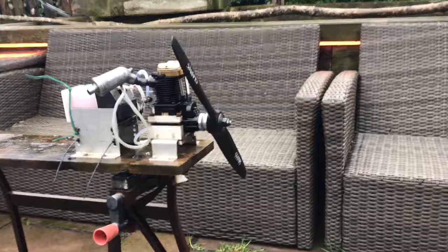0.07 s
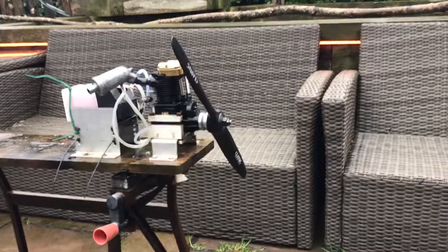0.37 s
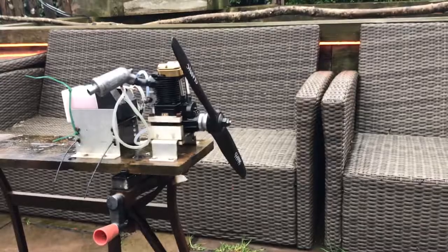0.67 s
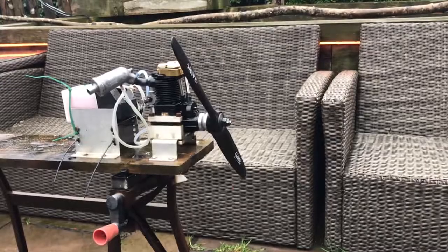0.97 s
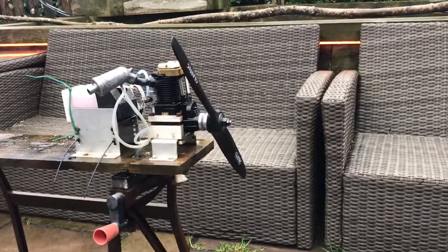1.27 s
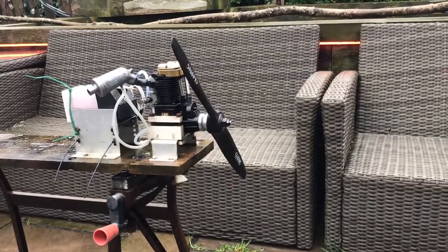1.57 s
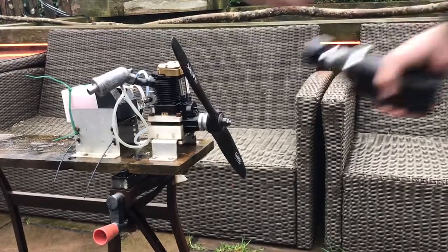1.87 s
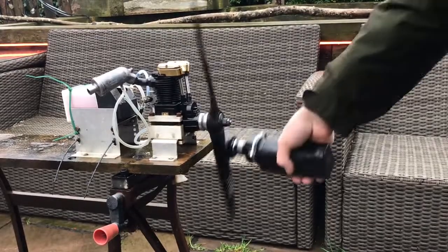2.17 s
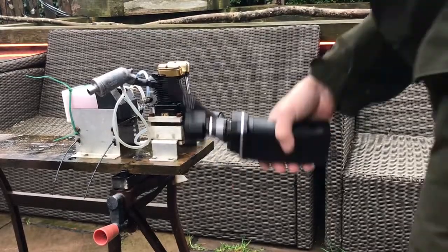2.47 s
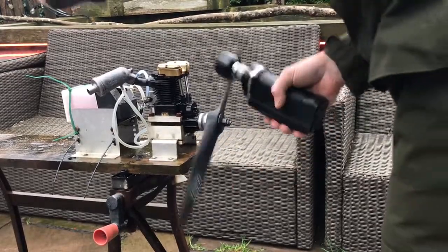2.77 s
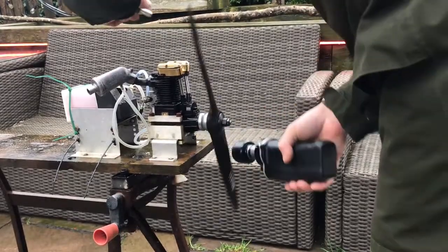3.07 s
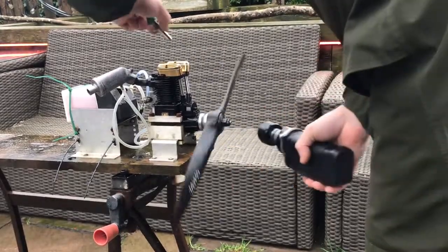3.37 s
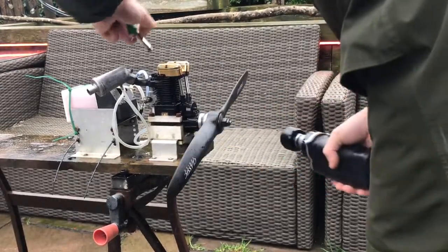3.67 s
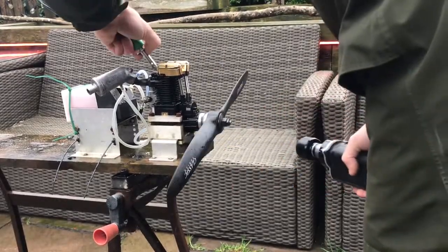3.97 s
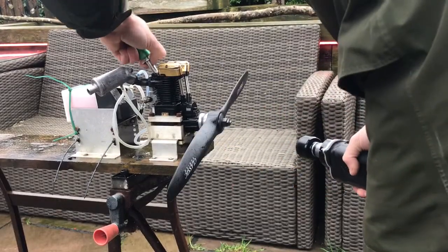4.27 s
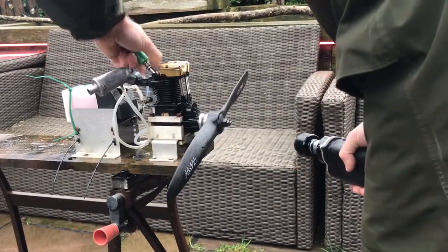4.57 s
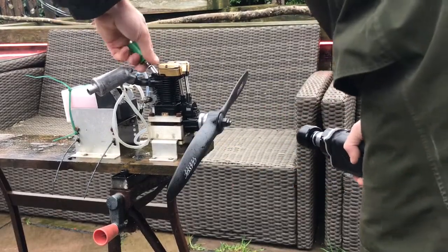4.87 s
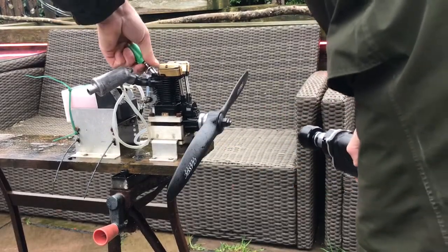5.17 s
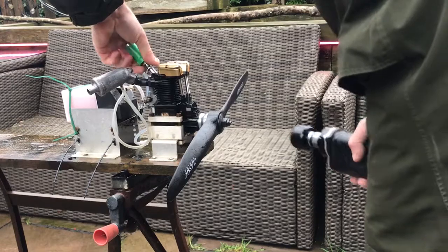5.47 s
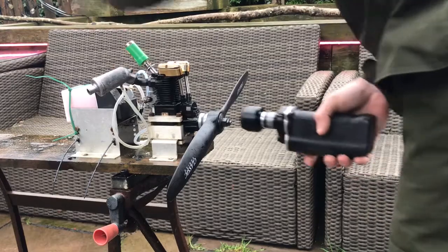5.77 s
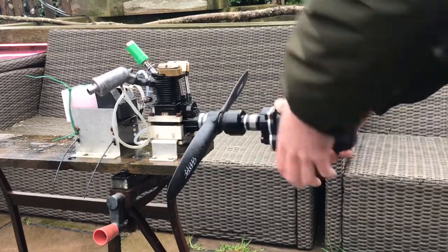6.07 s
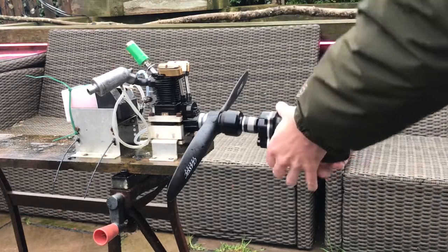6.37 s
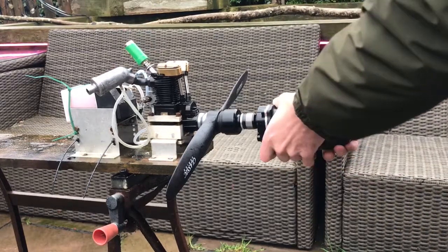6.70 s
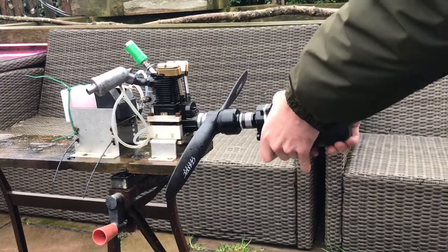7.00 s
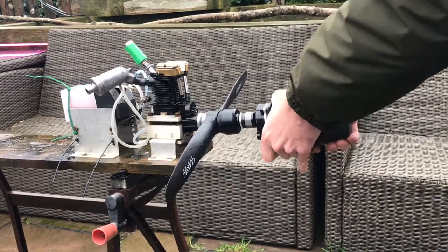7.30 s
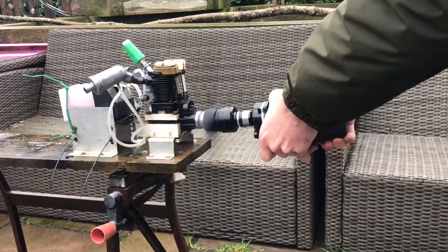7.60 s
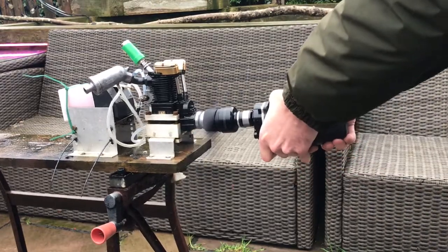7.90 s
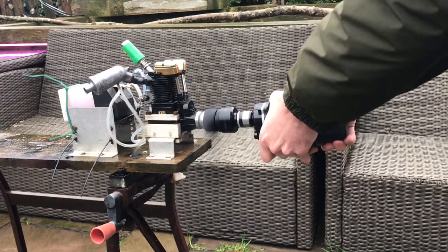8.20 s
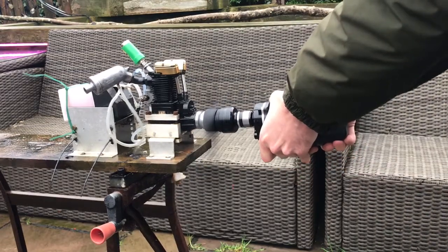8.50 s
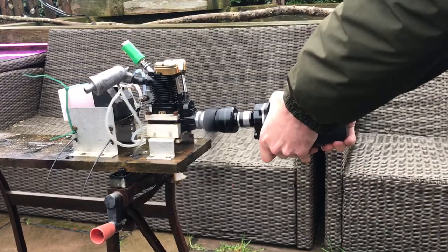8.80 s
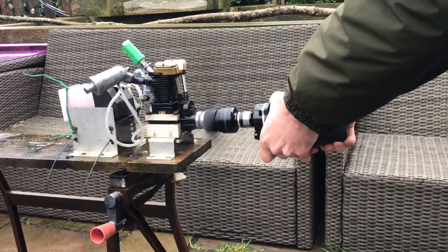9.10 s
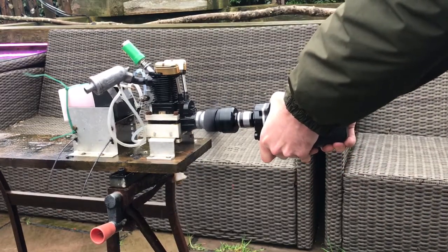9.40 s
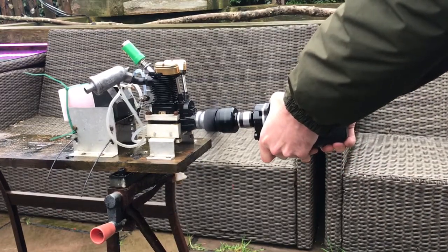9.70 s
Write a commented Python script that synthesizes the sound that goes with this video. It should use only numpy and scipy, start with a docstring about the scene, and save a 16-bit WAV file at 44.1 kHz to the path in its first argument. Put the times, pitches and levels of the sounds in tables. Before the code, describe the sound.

In a quiet garden, small birds chirp and gusts of wind thump on the nearby microphone. A jacket rustles, and a handheld electric starter knocks sharply against a model engine's propeller hub. Small metal clicks follow as the engine is handled. Near the end the starter spins up with a loud geared whine and rattle, cranking the engine in fast, even puffs, but it never fires.

```python
"""Cranking a model engine

A hand-held geared starter cranks a small four-stroke engine on a garden table; it does not fire.
First come impacts and friction: the starter's cone knocks the propeller hub, a glow igniter is
fitted, a jacket rustles. Then meshing gears whine and rattle under each compression while the engine
puffs once a cycle. Birds chirp; gusts and the propeller's draught buffet the microphone."""
import sys
import numpy as np
from scipy import signal
from scipy.fft import rfft, irfft
from scipy.io import wavfile
from scipy.ndimage import uniform_filter1d

SR = 44100
rng = np.random.default_rng(int(sys.argv[2]) if len(sys.argv) > 2 else 0)


def persist_wave(psi):
    """Save psi, clipped to +-1, as 16-bit WAV."""
    counts = np.round(np.clip(psi, -1, 1) * 32767).astype(np.int16)
    wavfile.write(sys.argv[1], SR, np.atleast_2d(counts).T)


N = 434385
TIME = np.arange(N) / SR
TRIGGER_S, FIRST_PUFF_S = 7.426, 7.541

# spectra of the distant background, wind buffeting and small eddies: f/Hz, relative level/dB
GARDEN_SPECTRUM = [(30, 7), (70, 2), (150, -12.5), (300, -8), (700, -11.5), (1250, -10.5), (2000, -21),
                   (4000, -29.5), (8000, -38), (16000, -41)]
BUFFET_SPECTRUM = [(15, -40), (30, -33.5), (48, 2), (80, 1), (120, -4.5), (200, -17), (300, -30),
                   (500, -54)]
EDDY_SPECTRUM = [(25, -38), (50, -16), (110, 0.5), (200, 3.5), (330, -6.5), (520, -21), (900, -36),
                 (2000, -90)]
# gusts on the microphone: t/s, duration/s, buffeting level/dB, eddy level/dB
WIND_GUSTS = [(0.1, 0.032, -38.5, -58), (0.174, 0.033, -36.5, -68), (0.447, 0.13, -40, -54),
              (0.854, 0.019, -38.5, -77), (1.015, 0.053, -46.5, -75), (1.178, 0.037, -45, -56),
              (1.861, 0.046, -67, -52), (2.246, .26, -40, -47.5), (2.378, 0.039, -35, -38),
              (2.836, 0.029, -40, -37.5), (2.876, 0.055, -33, -35.5), (3.007, 0.081, -39.5, -45.5),
              (3.203, 0.093, -39.5, -53), (3.39, 0.052, -36.5, -48), (3.49, 0.03, -38.5, -50.5),
              (3.787, 0.22, -38, -49), (4.251, 0.084, -38.5, -49), (4.337, 0.16, -43, -49.5),
              (4.556, 0.088, -38.5, -52), (4.675, 0.097, -41, -65), (5.182, 0.039, -40, -58),
              (5.288, 0.027, -35, -58), (5.388, 0.11, -36, -60), (5.565, 0.044, -36, -41.5),
              (5.735, 0.088, -50, -49), (5.878, 0.053, -42, -48.5), (6.07, 0.049, -42, -45),
              (6.237, 0.084, -39.5, -48), (6.374, 0.037, -41, -39), (6.498, 0.1, -35.5, -38.5),
              (6.728, 0.18, -40.5, -46.5), (7.054, 0.09, -42, -49.5), (7.313, 0.17, -39.5, -44.5),
              (8.24, 0.18, -36.5, -49), (8.807, 0.11, -32, -52), (9.42, 0.071, -30, -35.5),
              (9.503, 0.089, -38, -33.5)]
# light air between the gusts: t/s, buffeting level/dB
BREEZE_LEVEL = [(0, -49), (1.3, -57.5), (2.05, -59.5), (2.6, -47), (3.6, -54), (4.2, -54), (5.6, -52),
                (6.3, -41.5), (7, -49), (9.85, -37.5)]
# eddies that strike the microphone squarely: t/s, f/Hz, peak level/dB
LARGE_EDDIES = [(2.404, 169, -25), (2.858, 209, -28.5), (2.896, 373, -24.5), (2.898, 69.6, -26),
                (2.918, 190, -29), (2.93, 110, -30), (3.042, 165, -29), (3.933, 125, -29),
                (4.266, 140, -27.5), (5.586, 161, -32), (6.092, 137, -29), (6.123, 112, -25),
                (6.247, 97, -28.5), (6.28, 122, -23), (6.4, 420, -33), (6.402, 177, -25.5),
                (6.497, 115, -28), (6.525, 95, -20), (6.569, 158, -32), (6.588, 186, -29),
                (6.894, 136, -28), (7.067, 139, -33.5), (7.114, 137, -30), (7.342, 215, -26),
                (7.412, 130, -28)]

# two-note chirrups: t/s, relative level/dB, pitch factor, duration factor, fall in level/dB,
# phase jitter/rad, gain of the direct sound/dB
BIRD_CHIRRUPS = [(.112, -54, 0.98, 0.95, 7.5, 0.5, 4), (0.679, -55, 0.98, 0.91, 8.5, 0.6, 2.5),
                 (1.538, -56.5, 0.98, 0.88, 2.5, 0.46, 1.5), (2.921, -66.5, 0.99, 0.84, -6, 0.54, -2),
                 (3.198, -54.5, 1.04, 0.97, 6, 0.56, -2), (4.205, -57.5, 0.99, 1.1, 14, .65, -3),
                 (4.459, -56, 1.02, 1, 9, 0.91, -7), (5.744, -56.5, 0.94, 0.57, 6, 0.89, -7),
                 (6.89, -59, 1.06, 1.0, 7, 0.57, 0)]
# contour of one chirrup: t/s, f/Hz, relative level/dB
CHIRRUP_CONTOUR = [(0, 4020, 1), (.009, 4490, 2.5), (.032, 4410, 2), (.043, 3630, 6.5), (.06, 3430, -10),
                   (.078, 2960, 2), (.106, 3880, 7), (.118, 2950, 8), (.135, 2750, -28)]
# rasp that opens a chirrup: f/Hz, relative level/dB
RASP_SPECTRUM = [(4000, -8), (4700, -10), (6200, -7), (7500, -16)]
# thin whistled notes: t/s, duration/s, start f/Hz, end f/Hz, relative level/dB
BIRD_WHISTLES = [(3.51, 0.06, 6940, 6400, -65), (3.544, 0.14, 6350, 5650, -62),
                 (3.668, 0.039, 4450, 5600, -64), (3.676, 0.046, 6150, 5850, -54.5),
                 (4.765, 0.069, 6340, 4970, -67), (4.874, 0.076, 5250, 5800, -58.5),
                 (5.288, 0.031, 7000, 6160, -67), (5.3, .045, 4560, 4780, -63),
                 (5.34, 0.05, 4970, 6150, -57.5), (5.423, 0.044, 4900, 5300, -61.5),
                 (6.39, 0.052, 5800, 5600, -55), (6.48, 0.049, 5350, 5850, -54),
                 (7.223, 0.046, 4500, 5440, -58), (7.276, 0.017, 5860, 5880, -52),
                 (7.285, 0.047, 5430, 4960, -59), (7.343, 0.044, 3560, 5100, -55.5)]

# strokes of the jacket sleeve: t/s, duration/s, level/dB
SLEEVE_STROKES = [(0.475, 0.28, -65), (0.627, 0.2, -67.5), (1.103, 0.24, -60), (1.365, 0.56, -65.5),
                  (1.842, 0.046, -50.5), (1.946, 0.3, -60.5), (2.364, 0.15, -61.5), (2.86, 0.21, -72),
                  (5.776, 0.16, -52.5), (6.003, 0.4, -50.5), (6.494, 0.14, -53), (6.554, 0.04, -55),
                  (6.654, 0.056, -52.5)]
# rubbing nylon: f/Hz, relative level/dB
NYLON_SPECTRUM = [(880, -4), (1500, -6.5), (1790, -7), (2250, -6), (5070, -10), (5600, -7.5), (7690, -10.5),
                  (15100, -10.5), (16000, -3.5)]

# clicks of the glow igniter and the starter: t/s, level/dB
SMALL_CLICKS = [(1.261, -34), (1.273, -46), (1.8967, -39.5), (4.294, -49), (4.371, -53), (4.391, -57),
                (4.4547, -51), (4.547, -37), (4.581, -53), (4.7046, -53), (4.721, -51), (5.4222, -58),
                (6.268, -54), (6.288, -56), (6.349, -54), (6.44, -40), (6.639, -40), (7.385, -45),
                (7.403, -45), (7.623, -37)]
# knocks on the engine: t/s, crack level/dB, mount level/dB, struck part's f/Hz, its level/dB
ENGINE_KNOCKS = [(1.997, -59, -60, 1310, -49), (2.1835, -55, -56, 1003, -52),
                 (2.1919, -16, -32.5, 1940, -21), (4.55, -50, -58.5, 855, -32),
                 (4.581, -54, -59.5, 1010, -52), (5.4212, -56, -67, 1400, -54),
                 (5.896, -58, -58, 1340, -45), (5.98, -39, -55.5, 1325, -30), (6.267, -56, -65, 686, -50),
                 (6.3488, -44, -63, 1090, -46), (7.427, -43, -46.5, 1240, -42),
                 (7.497, -51, -47, 1200, -46), (7.542, -43, -51, 1220, -35), (7.625, -49, -47, 686, -35),
                 (7.671, -42, -47, 1130, -37), (7.729, -41, -50, 690, -34.5), (7.777, -46, -49, 1190, -38),
                 (7.826, -43, -47, 640, -34), (7.932, -31, -46, 1310, -30), (8.021, -37, -47, 1210, -29)]
# modes of the engine mount and table: f/Hz, relative level/dB, T60/s
MOUNT_MODES = [(118, -9, .16), (222, -7, 0.16), (271, -10, .16), (330, -2, .19), (366, -1, 0.19),
               (467, -4, 0.2), (711, -5, 0.13), (865, 6.5, 0.08), (948, -3, 0.12), (1064, 6, 0.1),
               (1157, -2, 0.14), (1297, 1, 0.075), (2380, 0, .06), (2562, -3, 0.08), (3216, -6, 0.052),
               (4600, -19, 0.08), (6100, -19.5, .1), (8140, -21, .08)]
# spectra of a click, a knock's crack and the table top's dense, damped modes: f/Hz, relative level/dB
CLICK_SPECTRUM = [(700, 0), (2000, -7), (5000, -0.5), (8000, -5), (10300, -6), (12000, -5.5), (16000, -12)]
CRACK_SPECTRUM = [(200, -10), (500, -20), (1100, -2.5), (2400, 1), (3400, -5), (4500, -5.5), (5700, -4),
                  (6700, -17), (7600, -11.5), (10000, -25.5), (16000, -30)]
TABLETOP_SPECTRUM = [(150, -0.5), (330, -0.5), (560, 1), (800, 0), (1300, -3), (2000, -17)]

# scuff of the starter in the hand: t/s, duration/s, level/dB
SCUFFS = [(1.884, .04, -50.5)]
# air leaving the cylinder as the propeller is turned slowly: t/s, duration/s, level/dB
CYLINDER_LEAKS = [(2.398, 0.37, -60.5), (2.844, 0.27, -61.5), (7.435, .12, -62)]
# spectra of the scuff and of air forced through a narrow gap: f/Hz, relative level/dB
SCUFF_SPECTRUM = [(400, -2), (1000, 3.5), (1500, -5), (3000, -7), (5300, -4), (8000, -11), (12000, -12),
                  (16000, -13)]
LEAK_SPECTRUM = [(4000, -7), (10000, -20), (11800, -7), (14500, 1), (16000, -3)]
# squeaks of the rubber cone: t/s, duration/s, start f/Hz, end f/Hz, level/dB
CONE_SQUEAKS = [(2.435, 0.062, 1034, 1170, -49), (6.004, 0.24, 1510, 1640, -58)]

# rotation of the crankshaft: t/s, f/Hz
CRANK_SPEED = [(7.42, 8), (7.6, 15.42), (7.8, 21.14), (8.05, 21.92), (8.5, 22.57), (9.1, 22.96),
               (9.85, 23.6)]
# mean rotation of the starter motor, which spins up, slows under load and recovers: t/s, f/Hz
MOTOR_SPEED = [(7.43, 105), (7.47, 133), (7.55, 130), (7.62, 121), (7.72, 112), (7.8, 118), (7.9, 123),
               (8.05, 125.6), (8.5, 127.4), (9.1, 129.4), (9.85, 132)]
# effort of the starter: t/s, rattle level/dB, whine level/dB, added tooth bite, housing level/dB
STARTER_EFFORT = [(7.43, -48.5, -51, 8, -44), (7.52, -46, -50, 10, -49), (7.56, -38, -49, 13, -43),
                  (7.62, -39.5, -43.5, 13, -57), (7.76, -37.5, -44, 10, -63), (7.87, -36, -37, 6, -57),
                  (8.2, -36.5, -33.5, 2, -46), (8.9, -34, -33.5, 2.5, -41),
                  (9.85, -34.5, -35.5, 1.5, -33.5)]
# one four-stroke cycle: phase/cycles, gear load/dB, tooth bite, low-tone level/dB, gas flow/dB,
# hiss level/dB, speed surge
ENGINE_CYCLE = [(0, 3, -5, -1, -0.5, -10, .01), (.05, 4, -3.5, -1.5, -.5, -10, .016),
                (.15, 3, -4, 0, -2.5, -3, .02), (.22, 1.5, -8.5, -1, -13, -2, .012),
                (.32, 3.5, -5, 1, -15, -20, .002), (.42, -1, -12.5, 0.5, -35, -24, -.004),
                (.55, -1, -11, -1, -28, -22, -.045), (.62, 2, -4, 1, -30, -3, -.034),
                (.665, 4.5, -5.5, -0.5, -27, 2, -.01), (.74, 4, 0.5, 1.5, -28, -3, .022),
                (.85, 0.5, -10.5, 2.5, -24, -14, .006), (.955, 2, -4, 2.5, -33, -18, .005),
                (1, 0, -2, 1.5, -6, -10, .01)]
# gear tones: multiple of the motor's rotation frequency, relative level/dB
GEAR_ORDERS = [(4, -31), (5, 1.5), (6, -12.5), (8, -19), (9, -8.5), (10, 0.5), (11, -2), (12, -14),
               (15, -10.5), (20.1, -11.5), (22, -19), (30, -10), (31, -11.5)]
# housing resonances excited by rattling, and those sustained by grinding: f/Hz, bandwidth/Hz, gain/dB
RATTLE_MODES = [(638, 134, 5), (1300, 55, -11), (2730, 380, 4), (3520, 250, -4), (5400, 750, -19)]
SINGING_MODES = [(706, 74, -17), (1348, 123, 0)]
# strength of the engine's puffs: t/s, level/dB
PUFF_LEVEL = [(7.5, -36), (7.7, -31.5), (8.2, -30), (8.42, -31.5), (8.6, -35.5), (9.0, -35), (9.85, -34.2)]
# blows in each cycle (a valve shuts, the piston thuds at compression, the gears cross their backlash):
# phase/cycles, f/Hz, ring level/dB, T60/s, crack level/dB
CYCLE_BLOWS = [(.23, 290, -41.5, 0.03, -52), (.28, 540, -34.5, 0.044, -43), (0.557, 502, -32, 0.036, -52),
               (.605, 1080, -25.5, 0.017, -36), (.63, 315, -30.5, .04, -50), (.655, 2630, -29, .022, -29),
               (.82, 960, -32.5, 0.023, -51)]
# force of those blows: t/s, gain/dB
BLOW_GAIN = [(7.5, -8), (7.9, -6), (8.3, -2), (9.1, 0), (9.85, -3)]
# spectra of the gearbox, the puffs of gas and struck steel: f/Hz, relative level/dB
GEARBOX_SPECTRUM = [(200, -16), (300, -12), (420, -20.5), (620, -8), (740, -16), (1000, -11), (1350, -13),
                    (1550, -7.5), (2100, -13.5), (3950, -14), (4800, -19), (5500, -13), (7500, -22),
                    (10400, -32), (12000, -27.5), (16000, -35.5)]
GAS_SPECTRUM = [(2000, -8.5), (4000, -9), (6500, -11.5), (7200, 3), (8100, 2), (8700, -5), (9400, -3.5),
                (10300, -12), (11700, -1), (12300, -4), (13200, -12.5), (14500, -12)]
STEEL_SPECTRUM = [(1000, -8), (2000, -5), (2700, 2.5), (4000, 7.5), (5700, 6.5), (7000, -19), (10000, -40),
                  (12500, -27), (16000, -17)]


def undb(db):
    """Amplitude ratio of a level in decibels."""
    return np.exp(np.asarray(db) * np.log(10) / 20)


def unit(x):
    """Normalisation to unit rms."""
    return x / np.sqrt(np.mean(x ** 2) + 1e-18)


def curve(rows, at=TIME):
    """Linear interpolation of each column against the first."""
    s, *columns = np.transpose(rows)
    return [np.interp(at, s, c) for c in columns]


def colour(x, points, size=8192):
    """Minimum-phase filter through (f/Hz, level/dB) points, with unit gain for white noise."""
    hz, db = np.transpose(points)
    f = np.fft.rfftfreq(size, 1 / SR) + 1
    octaves_outside = np.maximum(0, np.maximum(np.log2(hz[0] / f), np.log2(f / hz[-1])))
    gain = undb(np.interp(np.log(f), np.log(hz), db) - 24 * octaves_outside)
    cepstrum = irfft(np.log(unit(gain) + 1e-5))
    cepstrum[1:size // 2] *= 2  # folding the cepstrum makes the response causal
    cepstrum[size // 2 + 1:] = 0
    return signal.oaconvolve(x, irfft(np.exp(rfft(cepstrum))))[:len(x)]


def rounded(x, points):
    """Zero-phase filter: an impulse spreads symmetrically in time, leaving no sharp front."""
    hz, db = np.transpose(points)
    f = np.fft.rfftfreq(len(x), 1 / SR) + 1
    return irfft(rfft(x) * undb(np.interp(np.log(f), np.log(hz), db)), len(x))


def noise(points, count=N):
    """Gaussian noise of the given spectrum, with rms near 1."""
    return colour(rng.standard_normal(count), points)


def resonate(x, hz, width):
    """Second-order resonator with unit gain at its centre."""
    return signal.lfilter(*signal.iirpeak(hz, hz / width, fs=SR), x)


def walk(rate, count=N):
    """Smooth random modulation of unit rms, with `rate` new values a second."""
    hold = max(2, int(SR / rate))
    steps = np.repeat(rng.standard_normal(count // hold + 1), hold)[:count]
    return unit(uniform_filter1d(steps, hold))


def glide(hz, jitter_rad, jitter_hz):
    """Gliding tone: phase is the integral of frequency, roughened by random modulation."""
    return np.sin(2 * np.pi * np.cumsum(hz) / SR + jitter_rad * walk(jitter_hz, len(hz)))


def rise(s):
    """Exponential approach to 1 with time constant s."""
    return 1 - np.exp(-TIME[:SR // 2] / s)


def fade(t60):
    """Exponential decay, 60 dB in t60 seconds."""
    return np.exp(-np.log(1000) * TIME[:SR // 2] / t60)


def ring(hz, t60):
    """Free vibration of one damped mode."""
    return np.sin(2 * np.pi * hz * TIME[:SR // 2]) * fade(t60)


def burst(t60):
    """Exponentially decaying white noise."""
    return rng.standard_normal(SR // 2) * fade(t60)


def add(out, s, x):
    """Superposition of x on out, starting at time s."""
    i = int(s * SR)
    out[i:i + len(x)] += x[:max(0, N - i)]


def swells(starts, lengths, dbs, attack_s, release_s):
    """Envelope of pushes that rise, hold and decay; being incoherent, they add in power."""
    power = np.zeros(N)
    for s, length, db in zip(starts, lengths, dbs):
        t = TIME[TIME < length + 10 * release_s]
        attack = np.sin(np.pi / 2 * np.minimum(t / attack_s, 1)) ** 2
        release = np.exp(-np.maximum(t - length, 0) / release_s)
        add(power, s, (undb(db) * attack * release) ** 2)
    return np.sqrt(power)


def echo(x, t60, wet_db):
    """Scattering from fences, walls and furniture adds a diffuse tail to the direct sound."""
    tail = burst(t60) * (TIME[:SR // 2] > .004)
    return x + undb(wet_db) * signal.fftconvolve(x, tail / np.linalg.norm(tail))[:N]


def garden():
    """Incoherent sources, distant traffic and air, sum to a nearly steady noise."""
    swell_db = .4 * walk(2)
    return noise(GARDEN_SPECTRUM) * undb(-58 + swell_db)


def airflow():
    """Buffeting and eddy envelopes: gusts, breeze and the propeller's draught add in power."""
    starts, lengths, *levels = np.transpose(WIND_GUSTS)
    gust, gust_eddy = [swells(starts, lengths, db, attack_s=.012, release_s=.029) for db in levels]
    breeze = undb(curve(BREEZE_LEVEL)[0] + .64 * walk(13))
    relative_speed = curve(CRANK_SPEED)[0] / CRANK_SPEED[-1][1]
    draught = undb(-41.5) * relative_speed ** .52 * (TIME > TRIGGER_S)
    buffet = np.linalg.norm([gust, breeze, draught], axis=0)
    eddy = np.linalg.norm([gust_eddy, breeze * undb(-15.5), draught], axis=0)
    return buffet, eddy


def wind(calm_pops_per_s=95, doubling_db=-39):
    """Turbulence buffets the microphone; stronger flow sheds more small eddies, each a soft pop."""
    buffet_gain, eddy_gain = airflow()
    buffets = noise(BUFFET_SPECTRUM)
    buffets /= np.sqrt(uniform_filter1d(buffets ** 2, SR // 16) + .14)  # evens out chance swells
    rate = calm_pops_per_s * (1 + eddy_gain / undb(doubling_db))
    pops = (rng.random(N) < rate / SR) * rng.uniform(-1.04, 1, N)
    eddies = unit(rounded(pops, EDDY_SPECTRUM))
    eddies /= np.sqrt(uniform_filter1d(eddies ** 2, SR // 16) + .11)
    return buffets * buffet_gain * undb(2.73 * walk(40)) + eddies * eddy_gain


def birds(pitch_wander=.0277, rasp_s=.05):
    """Frequency-modulated whistles from the hedges; hidden birds are heard mostly by scattering."""
    song, direct = np.zeros((2, N))
    rasp_window = np.hanning(int(rasp_s * SR))
    for s, db, pitch, stretch, fall_db, jitter_rad, direct_db in BIRD_CHIRRUPS:
        t = TIME[TIME < CHIRRUP_CONTOUR[-1][0] * stretch]
        hz, shape_db = curve(CHIRRUP_CONTOUR, t / stretch)
        hz = hz * pitch * (1 + pitch_wander * walk(61.5, len(t)))
        envelope = undb(db + shape_db - np.linspace(0, fall_db, len(t)))
        call = envelope * glide(hz, jitter_rad, jitter_hz=1200)
        add(song, s, call)
        add(direct, s, undb(direct_db) * call)
        add(song, s - rasp_s, undb(db - 10) * rasp_window * noise(RASP_SPECTRUM, len(rasp_window)))
    for s, length, start_hz, end_hz, db in BIRD_WHISTLES:
        hz = np.linspace(start_hz, end_hz, int(length * SR))
        call = undb(db) * signal.windows.tukey(len(hz), .5) * glide(hz, jitter_rad=.7, jitter_hz=980)
        add(song, s, call)
        add(direct, s, call)
    scattered = echo(song, t60=.3, wet_db=2.5) - song
    return .66 * (direct + scattered)


def jacket(stir_db=-74, catch_db=2.3):
    """Stick-slip friction: nylon catches and lets go as the arm moves, and never lies quite still."""
    slips = unit(rng.standard_normal(N) * undb(1.1 * walk(1500)))
    strokes = swells(*np.transpose(SLEEVE_STROKES), attack_s=.095, release_s=.078)
    rubbing = np.hypot(strokes, undb(stir_db))
    return colour(slips, NYLON_SPECTRUM) * rubbing * undb(catch_db * walk(45))


def knocks(contact_s=.0007, mount_rise_cycles=2.5):
    """Impact excitation: a crack, then free modes of the struck part and mount; small parts click."""
    cracks, rings, clicks = np.zeros((3, N))
    modes = sum(undb(db) * ring(hz, t60) * rise(mount_rise_cycles / hz) * rng.choice([-1, 1])
                for hz, db, t60 in MOUNT_MODES)
    mount = undb(1.5) * modes + undb(2.5) * colour(burst(t60=.18), TABLETOP_SPECTRUM)
    for s, crack_db, mount_db, hz, part_db in ENGINE_KNOCKS:
        part = ring(hz, t60=.035) + 2.14 * ring(hz * 1.075, t60=.018)
        add(cracks, s, undb(crack_db) * burst(t60=.035) * rise(contact_s))
        add(rings, s, undb(mount_db) * mount + undb(part_db) * part * rise(contact_s))
    for s, db in SMALL_CLICKS:
        add(clicks, s, undb(db) * burst(t60=.013))
    impacts = colour(cracks, CRACK_SPECTRUM) + rings + colour(clicks, CLICK_SPECTRUM)
    return echo(impacts, t60=.2, wet_db=-13.5)


def scuff(grain_db=3):
    """Sliding friction: the starter slips grittily in the hand as it is lifted."""
    grit = unit(rng.standard_normal(N) * undb(grain_db * walk(500)))
    return colour(grit, SCUFF_SPECTRUM) * swells(*np.transpose(SCUFFS), attack_s=.013, release_s=.04)


def leaks():
    """Jet noise: air hisses through a narrow gap while the piston is pushed against compression."""
    flow = np.zeros(N)
    for s, length, db in CYLINDER_LEAKS:
        add(flow, s, undb(db) * signal.windows.tukey(int(length * SR), .5))
    return flow * noise(LEAK_SPECTRUM)


def thumps(sigma_cycles=.38):
    """A large eddy swings the pressure at the microphone to and fro in a Gaussian wave packet."""
    out = np.zeros(N)
    t = TIME[:SR // 10] - TIME[SR // 20]
    for s, hz, db in LARGE_EDDIES:
        swing = np.cos(2 * np.pi * (hz * t + rng.random()))
        add(out, s + t[0], undb(db) * swing * np.exp(-.5 * (hz * t / sigma_cycles) ** 2))
    return out


def squeak():
    """Stick-slip oscillation of the rubber cone as it is pressed against the hub."""
    out = np.zeros(N)
    for s, length, start_hz, end_hz, db in CONE_SQUEAKS:
        hz = np.linspace(start_hz, end_hz, int(length * SR))
        add(out, s, undb(db) * np.hanning(len(hz)) * glide(hz, jitter_rad=.64, jitter_hz=300))
    return out


def rattle(motor_hz, load_db, teeth=10, scatter_db=4, throb_db=1):
    """Forced vibration: teeth strike and slide, harder once a motor turn, and drive the housing."""
    n = len(motor_hz)
    turns = np.cumsum(motor_hz) / SR
    strikes = np.diff(np.floor(teeth * turns), prepend=0)
    strikes = unit(strikes * undb(scatter_db * rng.standard_normal(n)) * rng.choice([-1, 1], n))
    sliding = rng.standard_normal(n)
    force_db = load_db + throb_db * np.sin(2 * np.pi * turns) + .54 * walk(60.7, n)
    body = colour((.67 * strikes + .89 * sliding) * undb(force_db), GEARBOX_SPECTRUM)
    housing = sum(undb(db) * resonate(body, hz, width) for hz, width, db in RATTLE_MODES)
    return unit(body + .5 * housing)


def whine(motor_hz, bite, low_db, flutter=.0005):
    """Periodic meshing gives tones; the upper ones swell with bite and are roughened most by play."""
    n = len(motor_hz)
    angle = 2 * np.pi * np.cumsum(motor_hz * (1 + flutter * walk(70.6, n))) / SR
    tones = 0
    for order, db in GEAR_ORDERS:
        height = min(order / 10, 1) ** 3  # near 0 for low tones, 1 from the tenth order up
        upper_db = .58 * bite + 1.4 * walk(110, n)
        grip_db = height * upper_db + (1 - height) * low_db + .6 * walk(90, n)
        play_rad = (.05 + .2 * height) * walk(80, n)
        tones += undb(db + grip_db) * np.sin(order * angle + rng.uniform(0, 2 * np.pi) + play_rad)
    return unit(tones)


def singing(bite):
    """Resonance: grinding teeth keep the housing ringing at its natural frequencies at any speed."""
    grind = rng.standard_normal(len(bite))
    ringing = sum(undb(db) * resonate(resonate(grind, hz, width), hz, width)
                  for hz, width, db in SINGING_MODES)
    return unit(ringing * undb(1.3 * bite))


def blows(t, cycles, scatter_db=1, detune=.025):
    """Impacts locked to the engine cycle, each a crack and a heavily damped mode."""
    rings, cracks = np.zeros((2, N))
    for cycle in range(int(cycles[-1]) + 1):
        for phase, hz, ring_db, t60, crack_db in CYCLE_BLOWS:
            s = np.interp(cycle + phase, cycles, t, right=N / SR)
            force = undb(curve(BLOW_GAIN, s)[0] + scatter_db * rng.standard_normal())
            add(rings, s, force * undb(ring_db) * ring(hz * (1 + detune * rng.standard_normal()), t60))
            add(cracks, s, force * undb(crack_db) * burst(t60=.013))
    return rings + colour(cracks, STEEL_SPECTRUM)


def cranking():
    """Cyclic loading: compression slows and strains the gears; turbulent gas puffs every two turns."""
    t = TIME[TIME > TRIGGER_S]
    n = len(t)
    crank_hz = curve(CRANK_SPEED, t)[0]
    cycles = np.cumsum(crank_hz) / SR / 2
    cycles -= np.interp(FIRST_PUFF_S, t, cycles)
    load_db, bite, low_db, flow_db, hiss_db, surge = curve(ENGINE_CYCLE, cycles % 1)
    rattle_db, whine_db, added_bite, sing_db = curve(STARTER_EFFORT, t)
    # a slow propeller stores less kinetic energy, so its speed swings more
    swing = .9 * np.minimum((crank_hz[-1] / crank_hz) ** 2, 2.5) * np.clip(cycles + 1, 0, 1) ** 2
    motor_hz = curve(MOTOR_SPEED, t)[0] * (1 + swing * surge)
    gears = undb(rattle_db) * rattle(motor_hz, load_db)
    gears += undb(whine_db) * whine(motor_hz, bite + added_bite, low_db)
    gears += undb(sing_db) * singing(bite)
    gas = noise(GAS_SPECTRUM, n) * undb(curve(PUFF_LEVEL, t)[0] + flow_db + 1.8 * walk(200, n))
    hiss = noise(LEAK_SPECTRUM, n) * undb(rattle_db - 10 + hiss_db + 1.6 * walk(150, n))
    out = blows(t, cycles)
    add(out, TRIGGER_S, gears + gas + hiss)
    return echo(out, t60=.06, wet_db=-15)  # the open garden returns only a brief echo


def scene():
    """Linear superposition of all sources at one microphone."""
    foreground = cranking() + knocks() + squeak() + scuff() + jacket() + leaks()
    return (foreground + birds() + wind() + thumps() + garden())[None]


def record(dry, open_s=.118, cutoff_hz=15900):
    """Gating and band limiting: the microphone opens after a moment; a steep low-pass cuts the top."""
    opened = dry * np.where(TIME > open_s, 1, undb(-56))
    return signal.sosfilt(signal.ellip(10, .2, 80, cutoff_hz, fs=SR, output="sos"), opened)


dry = scene()
out = record(dry)
persist_wave(out)
```